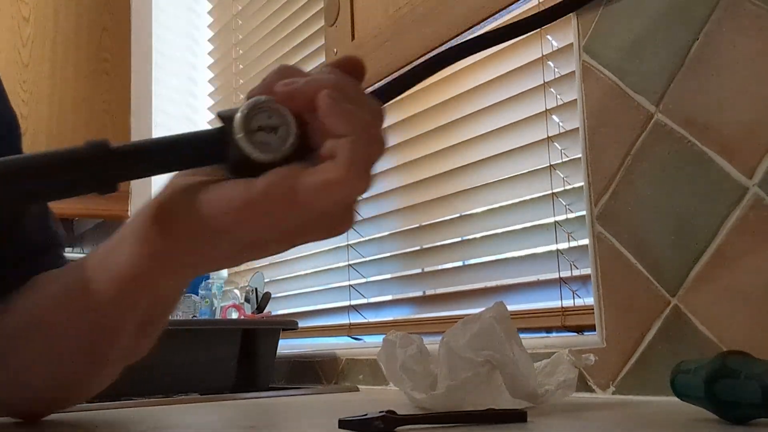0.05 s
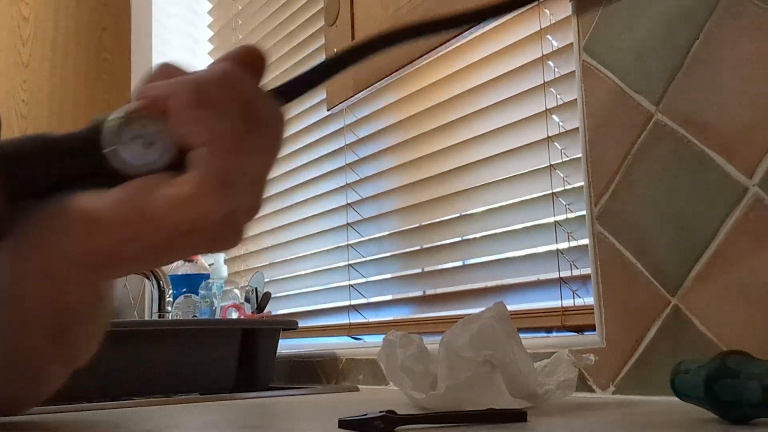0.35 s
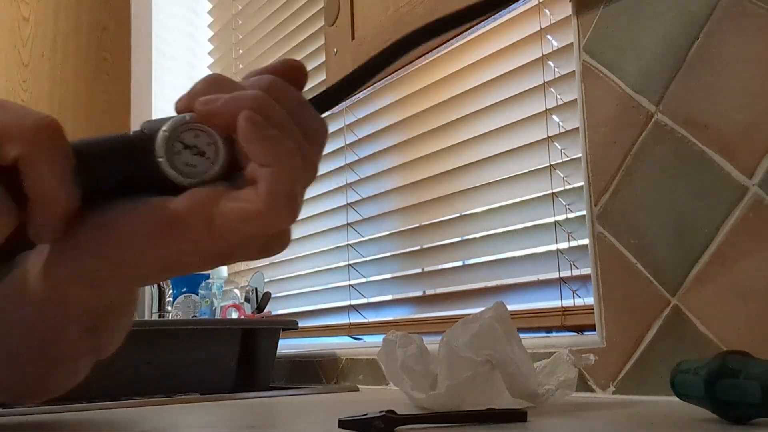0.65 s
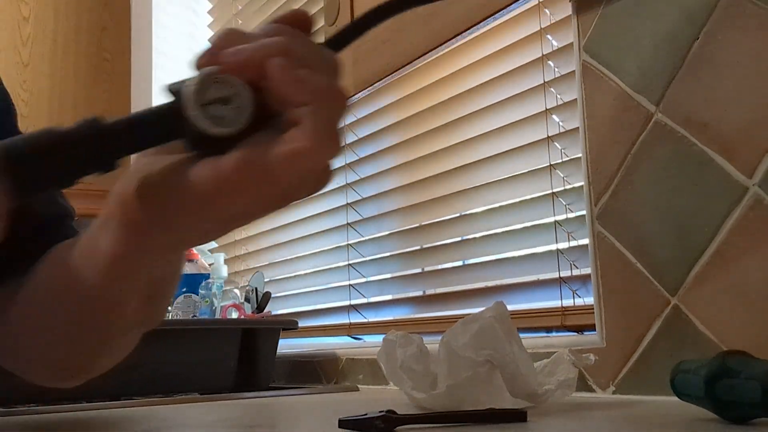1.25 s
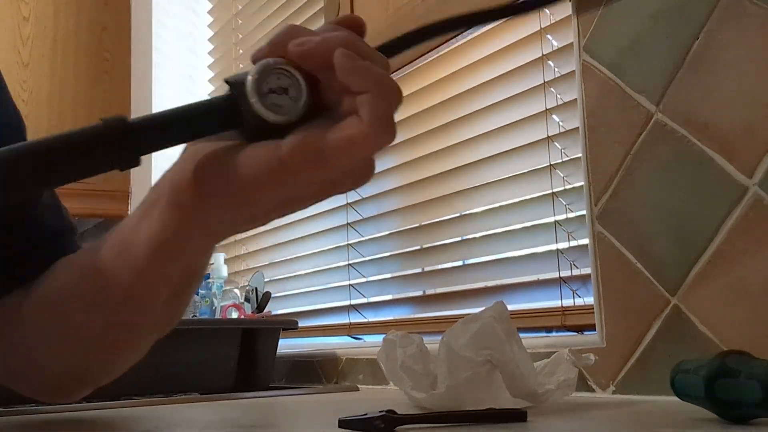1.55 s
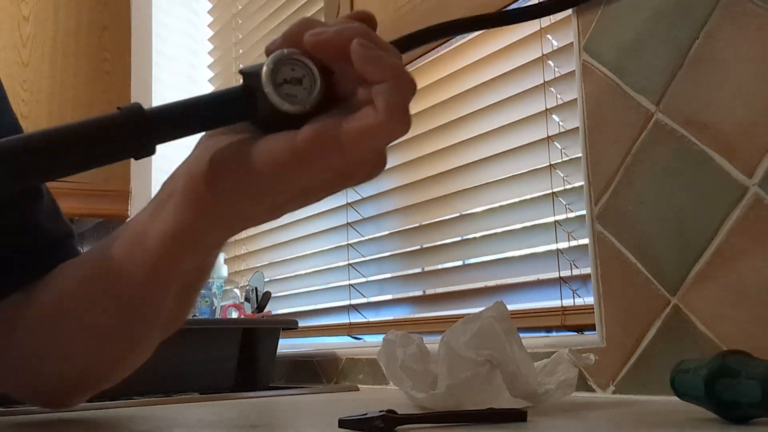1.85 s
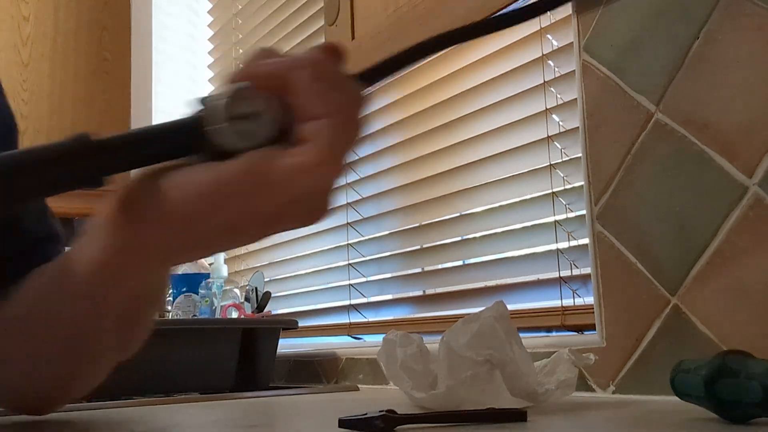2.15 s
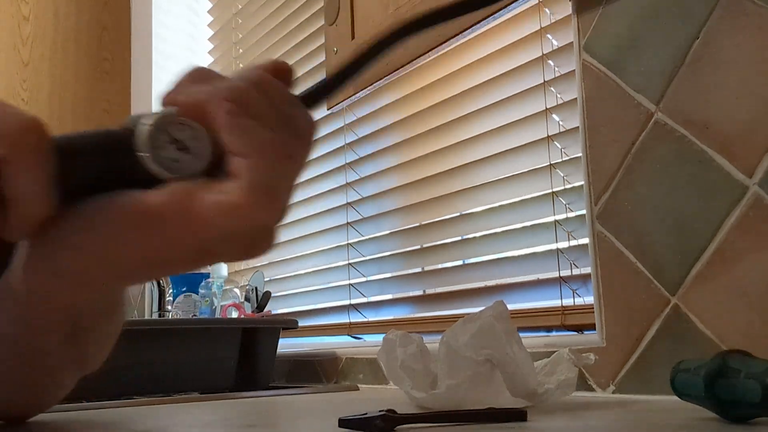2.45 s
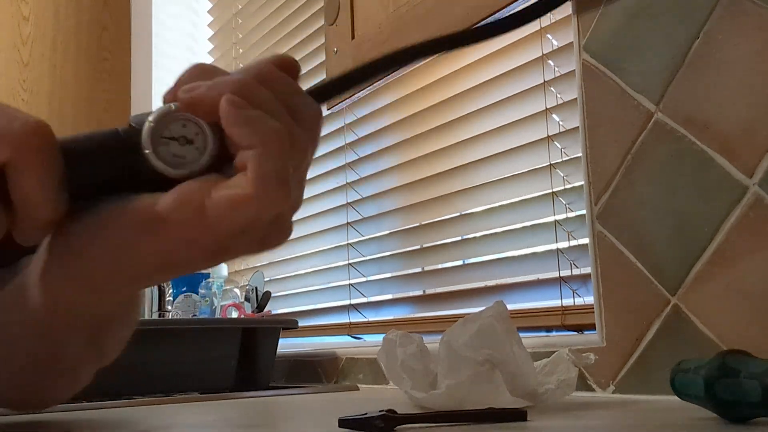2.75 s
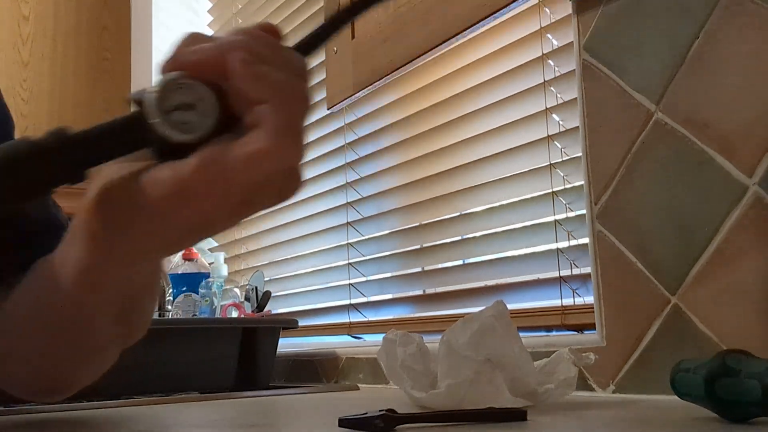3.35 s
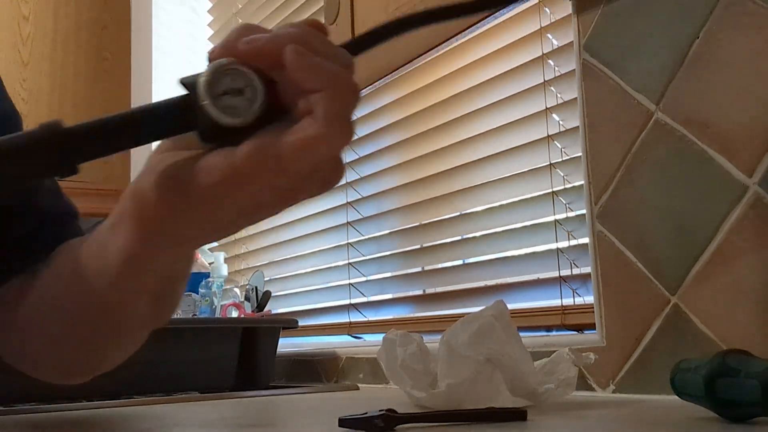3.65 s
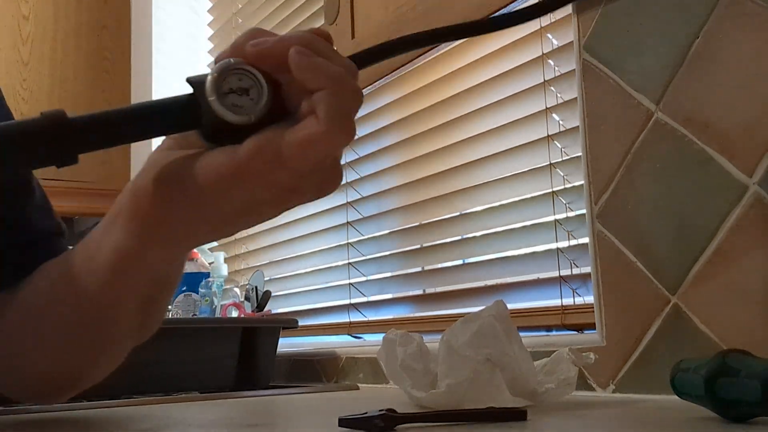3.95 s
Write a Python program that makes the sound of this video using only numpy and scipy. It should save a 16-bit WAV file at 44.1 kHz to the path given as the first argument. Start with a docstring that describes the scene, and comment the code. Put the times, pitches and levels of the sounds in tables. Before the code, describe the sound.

A hand pump chuffs and hisses in quick, even strokes, close by in a kitchen. Its valve chirps on every push and later whistles faintly a few times, with light handling knocks and a low rumble behind.

```python
"""A small hand air pump, worked at nearly four strokes a second, close to a stereo pair in a tiled kitchen.
Each stroke: a dull puff as the piston turns, a rasping chirp as the valve opens, a rush of air,
a hollow chuff at the end of the barrel, then a soft hiss as the piston is drawn back.
A few of the later strokes whistle thinly, and the pump scuffs and knocks in the hands. The right
microphone is a little nearer; behind the pump are the short ring of the tiles and a low, uneven rumble."""
import sys
import numpy as np
from scipy import signal
from scipy.fft import rfft, irfft
from scipy.io import wavfile
from scipy.ndimage import uniform_filter1d

SR = 44100
rng = np.random.default_rng(int(sys.argv[2]) if len(sys.argv) > 2 else 0)


def transcribe(u):
    """Save the signal u as a 16-bit wav file named by the first command-line argument.

    u: samples, shape (n,) or (channels, n), limited to [-1, 1]; the rate is SR.
    q: integer samples, one column per channel.
    """
    v = np.clip(np.atleast_2d(u).T, -1, 1)
    q = np.round(v * 32767).astype(np.int16)
    wavfile.write(sys.argv[1], SR, q)


N = 176400

# strokes: t/s, rush/dB, puff lead/s, puff/dB, chirp lead/s, chirp/dB, chuff lag/s, chuff/dB, draw/dB
STROKES = [(-.09, -17, .065, -43, 0.026, -31, 0.06, -34.5, -40.5),
           (0.167, -30.5, 0.06, -44, 0.027, -25.5, 0.04, -32, -41),
           (0.428, -29.5, 0.065, -38.5, .028, -25, 0.033, -32.5, -40.5),
           (0.69, -30, 0.11, -52, 0.028, -28.5, 0.034, -33, -43.5),
           (.948, -31, .067, -40, 0.029, -26, 0.031, -32.5, -43.5),
           (1.205, -31, 0.068, -39.5, 0.02, -29, 0.032, -30, -43.5),
           (1.465, -30.5, 0.064, -38.5, 0.029, -29, 0.036, -31.5, -44),
           (1.733, -31, 0.073, -39, 0.029, -27.5, 0.025, -34.5, -44.5),
           (1.994, -31, 0.071, -39, 0.032, -28.5, 0.027, -32.5, -44),
           (2.252, -31.5, 0.066, -36.5, .028, -27.5, 0.032, -32, -44.5),
           (2.502, -32, 0.074, -40.5, 0.024, -28.5, 0.034, -39.5, -45),
           (2.763, -32.5, 0.06, -38.5, 0.022, -24.5, 0.032, -38, -44.5),
           (3.034, -32, 0.069, -39, 0.026, -28.5, 0.024, -32, -43),
           (3.296, -32, 0.076, -42.5, 0.026, -28.5, 0.014, -31, -45.5),
           (3.562, -32.5, 0.069, -37.5, 0.029, -26.5, 0.024, -31, -46.5),
           (3.831, -31, 0.065, -37, 0.03, -30, 0.035, -31, -46)]
(STROKE_S, RUSH_DB, PUFF_LEAD_S, PUFF_DB, CHIRP_LEAD_S, CHIRP_DB,
 CHUFF_LAG_S, CHUFF_DB, DRAW_DB) = np.transpose(STROKES)
# valve resonances: f/Hz, width/Hz, relative level/dB
VALVE_MODES = [(1960, 60, -4.5), (2680, 25, -17), (2810, 124, -1), (2909, 110, 7.5), (2994, 71, 3),
               (3050, 43, -18), (3910, 37, -7), (6500, 88, -9.5), (8140, 320, -11)]
# occasional whistles and hand noises: t/s, level/dB
WHISTLES = [(2.254, -33.5), (2.504, -38), (3.035, -34), (3.835, -41)]
SCUFFS = [(0.592, -32), (3.22, -39.5)]
BUMPS = [(0.033, -46), (1.078, -43), (3.966, -36)]
THUDS = [(.96, -57), (1.99, -55), (2.765, -46), (3.57, -55)]
# noise spectrum of each source: f/Hz, relative level/dB
RUSH_SPECTRUM = [(300, -39), (1500, -40), (2400, -15.5), (3000, 4), (3700, -11), (4200, -21.5), (5000, -4),
                 (5800, -0.5), (6500, 6.5), (7300, 0), (8300, 3), (9800, -4), (11500, 1), (14500, -3.5),
                 (16000, -17)]
RASP_SPECTRUM = [(100, -13), (320, -14), (600, -3), (900, 0), (1200, 0.5), (1450, -5.5), (1900, 7),
                 (2350, -8), (2900, 8), (3400, 0.5), (4500, -6.5), (15000, -62)]
CHUFF_SPECTRUM = [(60, -66), (190, -8), (310, -17.5), (375, 5), (440, -1.5), (510, -10), (615, 2.5),
                  (770, -6), (930, -4.5), (1300, -13), (2000, -29), (4000, -35), (15000, -58)]
PUFF_SPECTRUM = [(70, -40), (130, 1.5), (240, -3.5), (400, 4), (750, -4.5), (1020, 3), (1300, 3),
                 (1750, -11), (2600, -7), (5000, -33), (15000, -64)]
SLIDE_SPECTRUM = [(200, 5.5), (600, -2), (1500, -33), (1900, -7), (2300, -1), (2900, 0), (3800, 8.5),
                  (4700, 3.5), (6600, 8), (8400, 7.5), (9800, 1), (12000, 4.5), (16000, -3)]
WHISTLE_SPECTRUM = [(5000, -54), (6400, -1), (7000, -1), (7400, -4), (7800, 0), (8300, 2.5), (8900, -17),
                    (11000, -23)]
SCUFF_SPECTRUM = [(100, -8), (400, 0), (700, -4), (1000, -1), (1400, -5), (2000, 3), (2400, 0), (2900, 1),
                  (3600, -10), (5000, -19), (9000, -25), (15000, -34)]
THUD_SPECTRUM = [(20, 2), (45, 6), (75, 4), (130, -14), (400, -30), (2000, -70)]
RUMBLE_SPECTRUM = [(20, -52), (50, -6), (80, -14), (122, 0.5), (170, -13.5), (260, -13.5), (420, -20.5),
                   (900, -25.5), (3000, -22.5), (15000, -60)]
ROOM_TONE_SPECTRUM = [(30, -4), (200, 0), (1000, -10), (4000, -20), (15000, -26)]
# course of the handling rumble: t/s, level/dB
RUMBLE_LEVELS = [(0, -62.5), (1.5, -57), (2.6, -57.5), (2.9, -62), (3.05, -55), (4, -54)]
# reverberation of the kitchen: f/Hz, T60/s
ROOM_T60 = [(100, 0.18), (500, 0.18), (3000, 0.33), (8000, 0.19), (16000, 0.06)]
# left microphone minus right: f/Hz, level/dB
MIC_BALANCE = [(60, 0), (125, -11), (300, -1), (700, 0.5), (2800, -3.5), (5000, -1.7), (9000, -0.5),
               (16000, 0)]


def pump():
    """All the phases of every stroke, heard right at the pump."""
    flow = swells(STROKE_S - .014, RUSH_DB, .042, .024, .052)
    rush = flow * turbulence(RUSH_SPECTRUM, grain_db=3)
    return rush + valve_chirp(flow) + seal_rasp() + barrel_chuff() + piston_puff() + shaft_hiss()


def valve_chirp(flow, flutter_hz=212.5, jitter=.35):
    """Irregular flutter and leaking air ring the valve as it opens; it keeps singing under the rush."""
    gaps_s = np.exp(jitter * rng.standard_normal(N // 50)) / flutter_hz
    onsets = (np.cumsum(gaps_s) * SR).astype(int)
    pulses = np.zeros(N)
    pulses[onsets[onsets < N]] = 1
    drive = unit_rms(pulses) + rng.standard_normal(N)
    ring = 0
    for hz, width, db in VALVE_MODES:
        radius = np.exp(-np.pi * width / SR)
        feedback = [1, -2 * radius * np.cos(2 * np.pi * hz / SR), radius ** 2]
        ring += from_db(db) * (1 - radius ** 2) * signal.lfilter([1, 0, -1], feedback, drive)
    opening = swells(STROKE_S - CHIRP_LEAD_S, CHIRP_DB, .021, .01, .035)
    return np.hypot(opening, from_db(-5) * flow) * unit_rms(ring)


def seal_rasp():
    """The seal rasps along the barrel, louder with a stronger rush."""
    rub = swells(STROKE_S - .0098, RUSH_DB + 1.5, .02, .028, .057)
    return rub * turbulence(RASP_SPECTRUM, grain_db=4.5)


def barrel_chuff(rebound_s=.041, rebound_db=-10.5):
    """The piston stops at the end of the barrel, then rebounds with a weaker second chuff."""
    shape_s = (.016, .013, .014)
    stop = swells(STROKE_S + CHUFF_LAG_S, CHUFF_DB, *shape_s)
    rebound = swells(STROKE_S + CHUFF_LAG_S + rebound_s, CHUFF_DB + rebound_db, *shape_s)
    return (stop + rebound) * turbulence(CHUFF_SPECTRUM, grain_db=2.5)


def piston_puff():
    """A dull puff as the piston turns."""
    turn = swells(STROKE_S - PUFF_LEAD_S, PUFF_DB, .019, .014, .03)
    return turn * turbulence(PUFF_SPECTRUM, grain_db=4)


def shaft_hiss(push_db=-46.5):
    """The shaft hisses softly as it starts to slide in, and again as it is drawn back."""
    push = swells(STROKE_S - .059, np.full(len(STROKES), push_db), .018, .018, .04)
    draw = swells(STROKE_S + .12, DRAW_DB, .066, .014, .052)
    return push * turbulence(SLIDE_SPECTRUM) + draw * turbulence(SLIDE_SPECTRUM)


def valve_whistle():
    """A few of the later strokes whistle thinly through the valve."""
    return swells(*np.transpose(WHISTLES), .045, .025, .04) * turbulence(WHISTLE_SPECTRUM)


def grip():
    """The shaft scuffs in its guide, the barrel knocks hollowly in the grip, and handling thuds softly."""
    scuffs = swells(*np.transpose(SCUFFS), .022, .012, .022) * turbulence(SCUFF_SPECTRUM, grain_db=2.5)
    bumps = swells(*np.transpose(BUMPS), .02, .014, .013) * turbulence(CHUFF_SPECTRUM)
    thuds = swells(*np.transpose(THUDS), .025, .012, .03) * turbulence(THUD_SPECTRUM)
    return scuffs + bumps + thuds


def kitchen(sides, direct_db=-3, room_db=-5, build_s=.003, smooth_hz=160):
    """Direct sound and a dense tail off the tiles, longest near 3 kHz; the right microphone is nearer."""
    t = np.arange(SR // 2) / SR
    padded = N + SR
    hz = np.fft.rfftfreq(padded, 1 / SR)
    edges_hz = np.geomspace(25, 19000, 12)
    tail = 0
    for low, high in zip(edges_hz, edges_hz[1:]):
        bandpass = signal.butter(2, [low, high], "band", fs=SR, output="sos")
        band = signal.sosfilt(bandpass, rng.standard_normal((2, len(t))))
        decay = from_db(-60 * t / at_hz(ROOM_T60, np.sqrt(low * high)))
        tail += band * decay * (1 - np.exp(-t / build_s))
    room = rfft(tail, padded)
    broad_power = uniform_filter1d(np.abs(room) ** 2, size=int(smooth_hz / hz[1]), axis=1)
    room /= np.sqrt(broad_power + 1e-6)  # no broad colour of its own
    balance = from_db(at_hz(MIC_BALANCE, hz) * np.array([[.5], [-.5]]))
    paths = (from_db(direct_db) + from_db(room_db) * room) * balance
    return irfft(rfft(sides, padded) * paths, padded)[:, :N]


def background(room_tone_db=-67):
    """A low handling rumble, partly common to both microphones, over the quiet of the room."""
    level = from_db(np.interp(np.arange(N) / SR, *np.transpose(RUMBLE_LEVELS)))
    common = turbulence(RUMBLE_SPECTRUM)
    sides = []
    for _ in range(2):
        rumble = level * (.56 * common + .76 * turbulence(RUMBLE_SPECTRUM))
        sides.append(rumble + from_db(room_tone_db) * turbulence(ROOM_TONE_SPECTRUM))
    return np.array(sides)


def turbulence(spectrum, grain_db=0, grain_hz=353.4):
    """Coloured noise at rms 1; grain breaks it into tiny uneven spurts."""
    spurts = np.interp(np.arange(N) / SR * grain_hz, np.arange(N), rng.standard_normal(N))
    noise = rng.standard_normal(N) * from_db(grain_db * spurts)
    colour = from_db(at_hz(spectrum, np.fft.rfftfreq(N, 1 / SR)))
    return unit_rms(irfft(rfft(noise) * colour, N))


def swells(times, levels_db, attack_s, hold_s, release_s):
    """A smooth rise up to each time, a hold, then a fall of 20 dB per release time."""
    power = np.zeros(N)
    for peak_s, db in zip(times, levels_db):
        near = np.arange(max(int((peak_s - attack_s) * SR), 0), min(int(peak_s * SR) + SR // 4, N))
        age = near / SR - peak_s
        rise = np.clip(1 + age / attack_s, 0, 1) ** 2
        fall_db = 20 * np.maximum(age - hold_s, 0) / release_s
        power[near] += (rise * from_db(db - fall_db)) ** 2
    return np.sqrt(power)


def at_hz(points, hz):
    """Read a table on a log-frequency axis."""
    table_hz, values = np.transpose(points)
    return np.interp(np.log(hz + 1e-9), np.log(table_hz), values)


def from_db(db):
    return 10 ** (np.asarray(db) / 20)


def unit_rms(x):
    return x / np.sqrt(np.mean(x ** 2) + 1e-20)


def scene(crossfeed=.07):
    """Air escapes all along the moving pump, so each microphone hears mostly turbulence of its own."""
    sides = np.array([pump() + valve_whistle() + grip() for _ in range(2)])
    return kitchen(sides + crossfeed * sides[::-1]) + background()


def record(dry, cutoff_hz=15850):
    """The top is cut steeply on both channels."""
    hz = np.fft.rfftfreq(N, 1 / SR)
    return irfft(rfft(dry) / np.sqrt(1 + (hz / cutoff_hz) ** 400), N)


dry = scene()
out = record(dry)
transcribe(out)
```